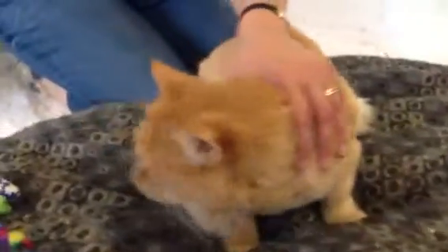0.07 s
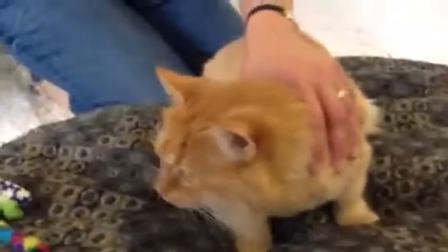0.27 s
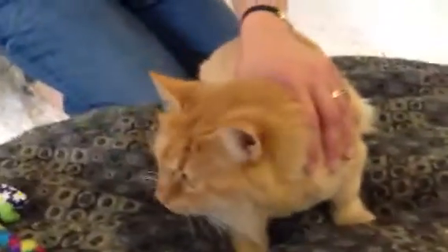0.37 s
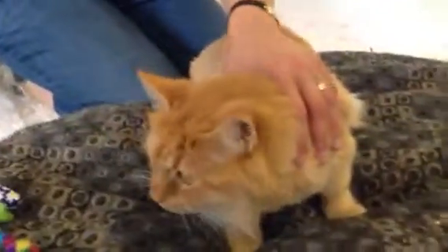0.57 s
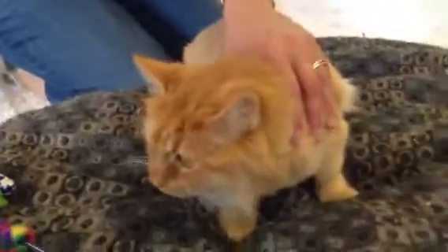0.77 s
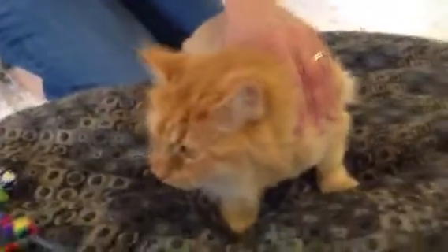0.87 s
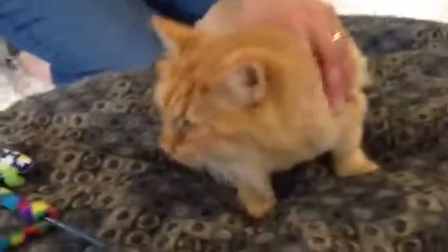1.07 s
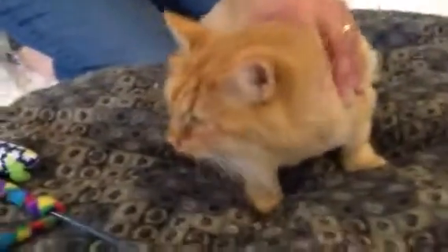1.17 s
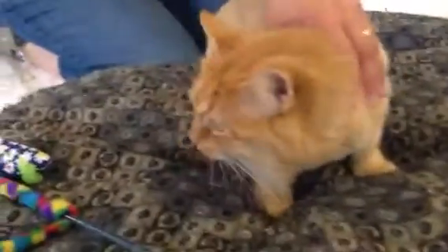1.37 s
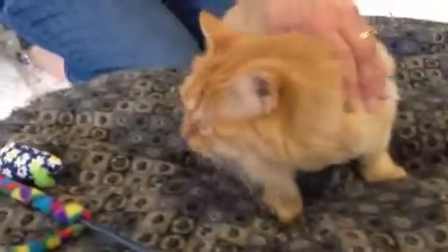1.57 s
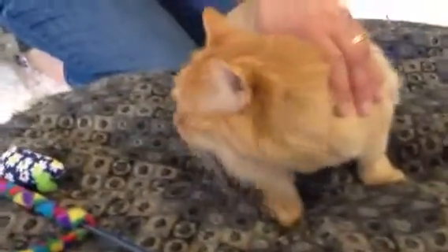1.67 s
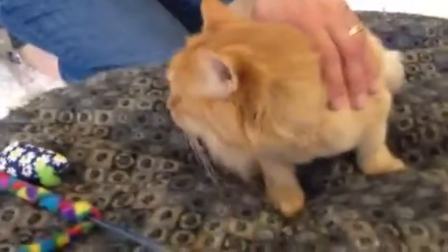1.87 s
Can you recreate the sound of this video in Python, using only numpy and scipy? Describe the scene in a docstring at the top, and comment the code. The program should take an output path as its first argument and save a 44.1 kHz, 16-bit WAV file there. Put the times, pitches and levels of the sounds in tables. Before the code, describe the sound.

Rapid two-note squeaks from a hand-pumped squeaky toy, over faint low hum and soft hiss indoors

```python
"""A small squeaky toy is pumped by hand: each squeeze drives its reed to a bright, high chirp, each release
draws air back through it for a lower, duller one, led in by a short whistle. Pitch, level and brightness follow
an arch of air pressure. A living room answers with near echoes and a ring that dies band by band.
Underneath lie filtered-noise rumble and hiss, and narrow noise bands that hum and waver; one dull knock comes late."""
import sys
import numpy as np
from scipy import signal
from scipy.fft import rfft, irfft
from scipy.io import wavfile

SR = 44100
rng = np.random.default_rng(int(sys.argv[2]) if len(sys.argv) > 2 else 0)


def gain_from_decibels(decibels):
    """Convert decibel values to linear amplitude factors."""
    exponent = np.asarray(decibels, float) / 20
    return 10 ** exponent


def wav_record(signal):
    """Record a signal, one row per channel, as 16-bit PCM in the file named by sys.argv[1]."""
    frames = np.transpose(np.atleast_2d(signal))
    bounded = np.clip(frames, -1, 1)
    # unit amplitude maps onto the largest positive 16-bit level
    quanta = np.round(bounded * 32767).astype(np.int16)
    wavfile.write(sys.argv[1], SR, quanta)


N = 85995

# Strokes of the hand: (reed catches [s], rise to highest pressure [s], fall [s], top pitch [Hz], level [dB],
# muffling by the hand [dB per octave])
SQUEEZE_STROKES = [(0.109, 0.012, 0.0159, 1206, -39, 5.0), (0.3602, .016, 0.024, 1567, -18, 0.17),
                   (0.594, 0.014, .032, 1562, -20.7, .0), (1.106, 0.0095, 0.0116, 1215, -40.5, 4.5),
                   (1.2875, 0.01387, .022, 1478, -25.5, -0.24), (1.479, 0.0083, 0.012, 1280, -37.5, 3.5),
                   (1.6487, 0.00987, .019, 1465, -25.5, 0.5)]
RELEASE_STROKES = [(0.223, 0.014, 0.025, 1116, -30.5, -0.43), (0.471, .024, 0.02, 1212, -23.5, 1.6),
                   (0.699, 0.021, 0.028, 1188, -27, 0.31), (1.198, .011, .017, 1089, -35, 0.63),
                   (1.389, .017, 0.0201, 1139, -31.5, 0.33), (1.571, 0.0095, 0.014, 1019, -39, 0.32),
                   (1.751, .021, .019, 1093, -35, 0.65)]
# Overtone strength in the reed's tone: (frequency [Hz], level [dB])
SQUEEZE_OVERTONES = [(1200, -3.5), (3000, -2), (4600, -3), (6200, -6), (7800, -4), (9200, -1.5),
                     (10800, -13), (12500, -18), (14500, -23)]
RELEASE_OVERTONES = [(1100, -2.5), (2300, 1), (3400, -6), (4600, -11.5), (5700, -12.5), (6900, -21.5),
                     (8100, -13), (9200, -8), (11000, -17), (13500, -22.5)]
# Pressure arch of the loudest stroke, a row for the rise and one for the fall:
# (pitch sag at the end [share], curve of the sag [exponent], fade at the end [dB], curve of the fade [exponent])
SQUEEZE_ARCH = [(.15, 3.45, 12.5, 2.97), (.11, 2.79, 9, 2.3)]
RELEASE_ARCH = [(.11, 1.7, 9.6, 2.7), (.14, 2.63, 9.2, 2.43)]
# Time the room takes to die by 60 dB: (frequency [Hz], time [s])
ROOM_DECAY = [(800, 0.96), (2000, 0.8), (5000, 0.74), (10000, 0.54), (15000, 0.62)]
# Colour of rumble and hiss: (frequency [Hz], relative level [dB])
FLOOR_COLOUR = [(18, -32.5), (30, -28), (75, -21.5), (152, 2.5), (256, -14.5), (341, -13), (546, -15.5),
                (728, -12.5), (1050, -21.5), (1820, -16), (2020, -19.5), (3780, -21), (15500, -34.5)]
# Humming noise bands: (centre [Hz], width [Hz], level [dB])
HUM_BANDS = [(134.8, 6.8, -61.5), (184, 28, -72.5), (352, 10.6, -73)]

# Reed manner: (dulling [dB per octave per dB of fade], pitch unrest at highest pressure [share], pulse lead [rad])
# The lead makes squeezes spike outwards and releases inwards.
SQUEEZE_REED = (0.18, 0.0031, 0.43)
RELEASE_REED = (0.22, 0.006, -0.63)
# A weaker stroke sags more and comes to a sharper point, per dB below the loudest
WEAK_SAG_PER_DB, WEAK_POINT_PER_DB = 0.0356, 0.03
CATCH_S, STALL_S = 0.0011, 0.0026  # the reed starts and stops swinging within a few cycles
FLUTTER_DB, AIR_DB = 3, -19  # overtone unrest; breathy leak, relative to the reed
WHISTLE_FROM_HZ, WHISTLE_S, WHISTLE_DB = 1720, 0.008, -8  # level is relative to the release
LEAD_IN = 1500  # samples kept ahead of the reed's catch

ROOM_DB, ECHO_DB = -16, -7  # late ring; near echoes
ECHO_S = 0.0145  # how long near echoes keep arriving
FLOOR_DB = -57
KNOCK_S, KNOCK_HZ, KNOCK_T60_S, KNOCK_DB = 1.788, 463, 0.06, -48


def at_hz(points, hz):
    """Reads a table on a log-frequency axis."""
    table_hz, values = np.array(points).T
    return np.interp(np.log(hz), np.log(table_hz), values)


def wobble(shape, rate_hz):
    """Slow random drift of spread 1: noise smoothed by two equal poles."""
    r = np.exp(-2 * np.pi * rate_hz / SR)
    x = signal.lfilter([1], [1, -2 * r, r * r], rng.standard_normal(shape))
    return x / x.std(axis=-1, keepdims=True)


def bandpass(x, low_hz, high_hz):
    """Passes one band of frequencies."""
    return signal.sosfilt(signal.butter(2, [low_hz, high_hz], "band", fs=SR, output="sos"), x)


def shaped_noise(gain):
    """White noise through a gain that depends on frequency, brought to rms 1."""
    hz = np.maximum(np.fft.rfftfreq(N, 1 / SR), 1)
    x = irfft(rfft(rng.standard_normal(N)) * gain(hz), N)
    return x / np.sqrt(np.mean(x ** 2) + 1e-20)


def rumble_and_hiss():
    """Steady broadband noise, coloured from low rumble up to soft hiss."""
    return gain_from_decibels(FLOOR_DB) * shaped_noise(lambda hz: gain_from_decibels(at_hz(FLOOR_COLOUR, hz)))


def hum():
    """Noise through narrow resonances: each band sounds as a tone that wavers."""
    out = np.zeros(N)
    for hum_hz, width, db in HUM_BANDS:
        out += gain_from_decibels(db) * shaped_noise(lambda hz: 1 / (1 + (2 * (hz - hum_hz) / width) ** 2))
    return out


def knock():
    """One soft, low, quickly damped ring."""
    t = np.maximum(np.arange(N) / SR - KNOCK_S, 0)
    onset = np.minimum(t / 0.0036, 1)
    return gain_from_decibels(KNOCK_DB - 60 * t / KNOCK_T60_S) * onset * np.sin(2 * np.pi * KNOCK_HZ * t)


def room(x):
    """Scattered near echoes, then a dense tail whose bands each die at their own rate."""
    t = np.arange(SR) / SR
    tail = np.zeros(SR)
    for low in 600 * 2 ** np.arange(0, 5, 0.5):
        high = low * 2 ** 0.5  # half an octave
        decay_db = -60 * t / at_hz(ROOM_DECAY, np.sqrt(low * high))
        build_up = np.minimum(t / ECHO_S, 1)
        tail += bandpass(rng.standard_normal(SR), low, high) * gain_from_decibels(decay_db) * build_up
    echoes = np.zeros(SR)
    lags = (np.arange(20) + rng.uniform(8, 9, 20)) / 28 * ECHO_S
    strengths = np.linspace(1.3, 0.6, 20) / np.sqrt(20)
    echoes[(lags * SR).astype(int)] = rng.choice([-1, 1], 20) * strengths
    response = gain_from_decibels(ROOM_DB) * tail / np.sqrt(np.sum(tail ** 2)) + gain_from_decibels(ECHO_DB) * echoes
    return signal.fftconvolve(x, response)[:N]


def inlet_whistle(t, reed_hz):
    """The inlet whistles ever louder, then drops onto the reed's pitch and gives way as the reed catches."""
    hz = reed_hz + (WHISTLE_FROM_HZ - reed_hz) * (0.5 - 0.5 * np.tanh(t / CATCH_S / 2))
    swell = np.exp(np.minimum(t, 0) / WHISTLE_S * 2)
    cutoff = 0.5 - 0.5 * np.tanh(t / CATCH_S - 2)
    return swell * cutoff * np.sin(2 * np.pi * np.cumsum(hz) / SR)


def reed_pulses(hz, fade_db, muffle_db, tone, dulling, lead):
    """Sixteen locked harmonics make one sharp pulse a cycle; lost pressure and the hand dull the upper ones."""
    k = np.arange(1, 17)[:, None]
    phase = 2 * np.pi * np.cumsum(hz) / SR
    dull_db = (dulling * np.minimum(fade_db, 30) + muffle_db) * np.log2(k)
    flutter_db = FLUTTER_DB * wobble((len(k), len(hz)), 50.4)
    parts = gain_from_decibels(at_hz(tone, k * hz) - dull_db + flutter_db) * (k * hz < 16500)
    loudness = np.sqrt(np.sum(parts ** 2, axis=0) / 2)
    return np.sum(parts * np.sin(k * phase + lead), axis=0) / loudness


def reed(strokes, tone, arch, manner, whistle_gain):
    """One arch of air pressure per stroke steers the pitch, level and brightness of a swinging reed."""
    out = np.zeros(N)
    t = np.arange(-LEAD_IN, 4000) / SR
    dulling, unrest, lead = manner
    loudest_db = max(row[4] for row in strokes)
    for start, rise, fall, top_hz, db, muffle_db in strokes:
        sag, sag_curve, end_fade_db, fade_curve = np.transpose(arch)[:, (t > rise).astype(int)]
        # distance from the highest pressure: 0 at the top, 1 at either end
        u = np.abs(t - rise) / np.where(t < rise, rise, fall)
        weak_db = loudest_db - db
        point = np.maximum(sag_curve * (1 - WEAK_POINT_PER_DB * weak_db), 1)
        sagged = sag * (1 + WEAK_SAG_PER_DB * weak_db) * u ** point
        hz = top_hz * np.clip(1 - sagged, 0.5, 1)
        hz = hz * (1 + unrest * (1 + np.minimum(u, 2)) * wobble(len(t), 170))
        fade_db = end_fade_db * u ** fade_curve
        pulses = reed_pulses(hz, fade_db, muffle_db, tone, dulling, lead)
        air = bandpass(rng.standard_normal(len(t)), 1500, 12000)
        caught = 0.5 + 0.5 * np.tanh(t / CATCH_S)
        not_stalled = 0.5 - 0.5 * np.tanh((t - rise - fall) / STALL_S)
        swing = caught * not_stalled * gain_from_decibels(-np.minimum(fade_db, 120))
        chirp = swing * (pulses + gain_from_decibels(AIR_DB) * air)
        chirp = chirp + whistle_gain * inlet_whistle(t, top_hz)
        # each stroke, with its lead-in, is added at its own time
        i = int(start * SR) - LEAD_IN
        out[i:i + len(t)] += gain_from_decibels(db) * chirp
    return out


def squeaky_toy():
    """Air pushed out drives the bright squeezes; air drawn back drives the duller, whistling releases."""
    squeezes = reed(SQUEEZE_STROKES, SQUEEZE_OVERTONES, SQUEEZE_ARCH, SQUEEZE_REED, 0)
    releases = reed(RELEASE_STROKES, RELEASE_OVERTONES, RELEASE_ARCH, RELEASE_REED, gain_from_decibels(WHISTLE_DB))
    return squeezes + releases


def scene():
    """The toy, its room, the knock and the background in one channel."""
    toy = squeaky_toy()
    mix = toy + room(toy) + knock() + rumble_and_hiss() + hum()
    return mix[None]


def roll_off(x):
    """The treble ends steeply here."""
    return signal.sosfilt(signal.butter(12, 16280, fs=SR, output="sos"), x)


def record(dry):
    """A steep low-pass takes the top off the mix, 50 dB down from 16270 Hz."""
    finished = signal.sosfilt(signal.cheby2(10, 50, 16270, fs=SR, output="sos"), dry)
    return roll_off(finished)


dry = scene()
out = record(dry)
wav_record(out)
```